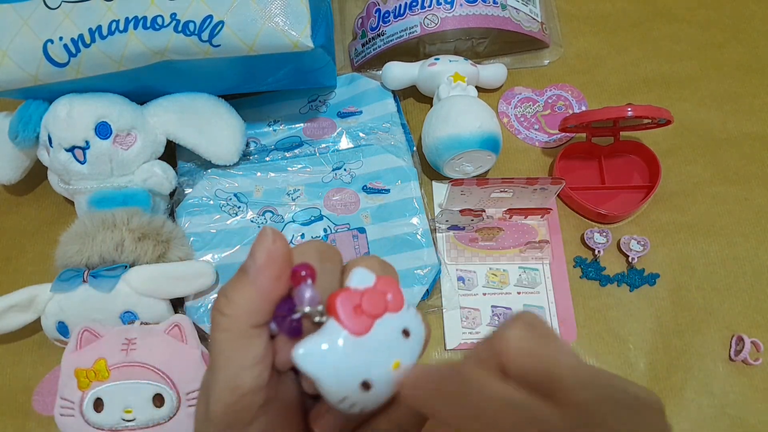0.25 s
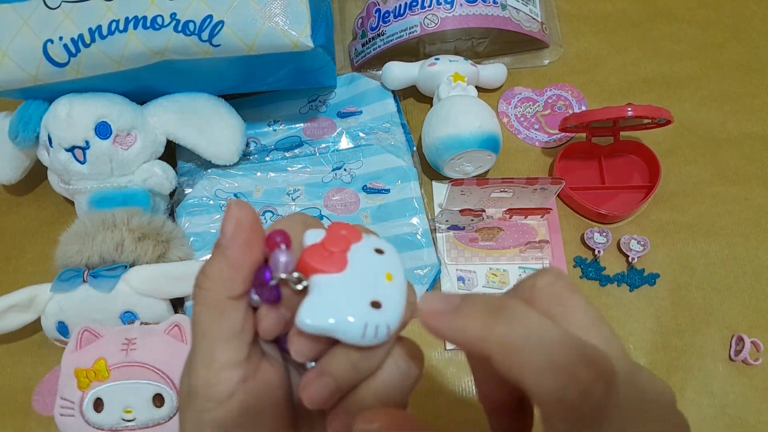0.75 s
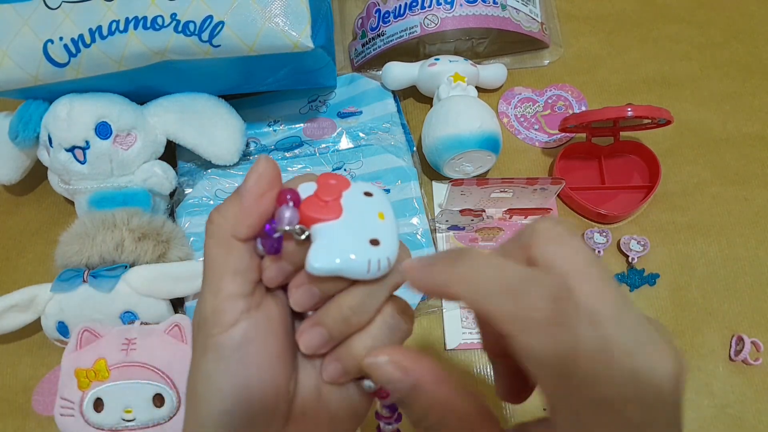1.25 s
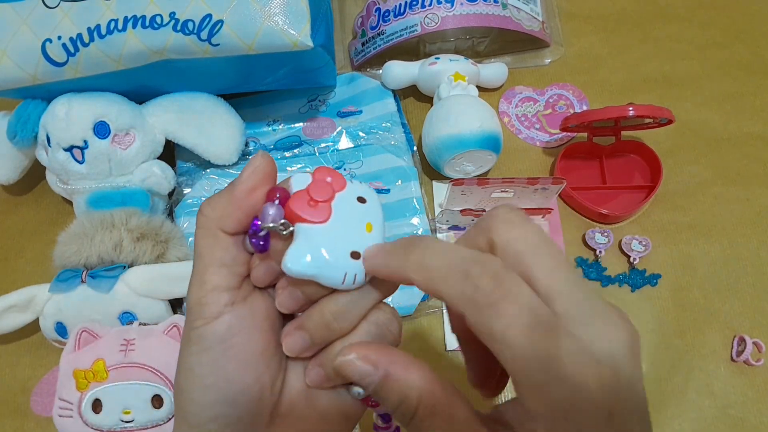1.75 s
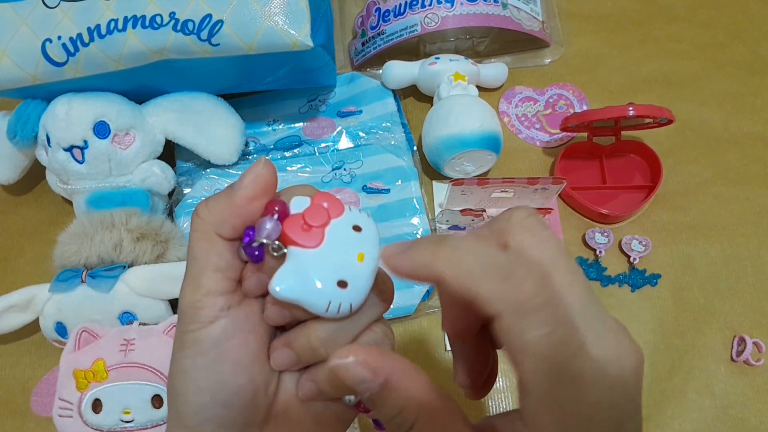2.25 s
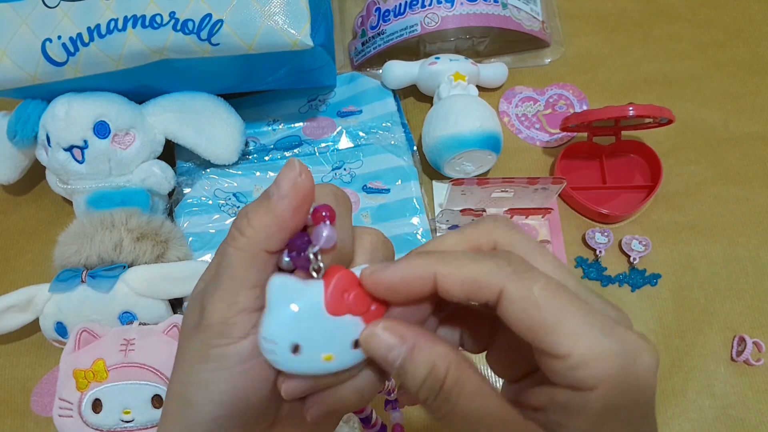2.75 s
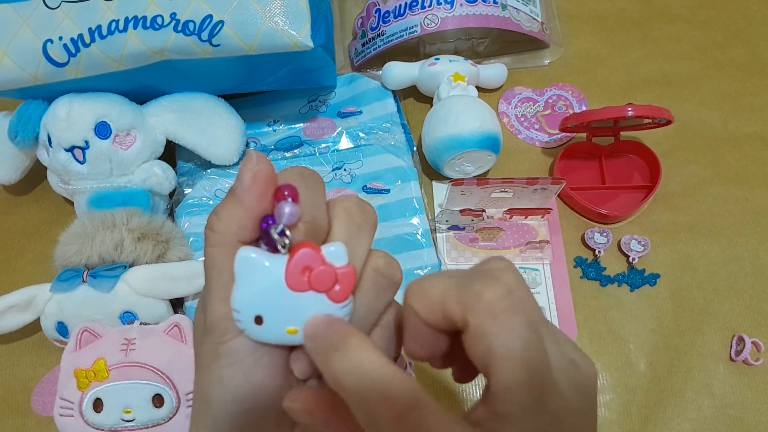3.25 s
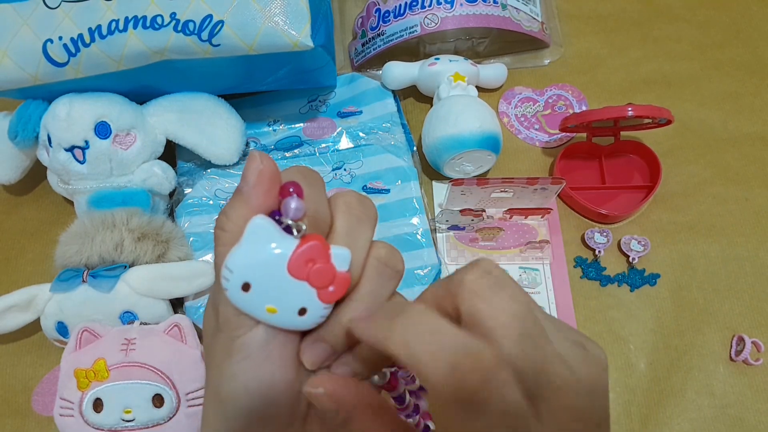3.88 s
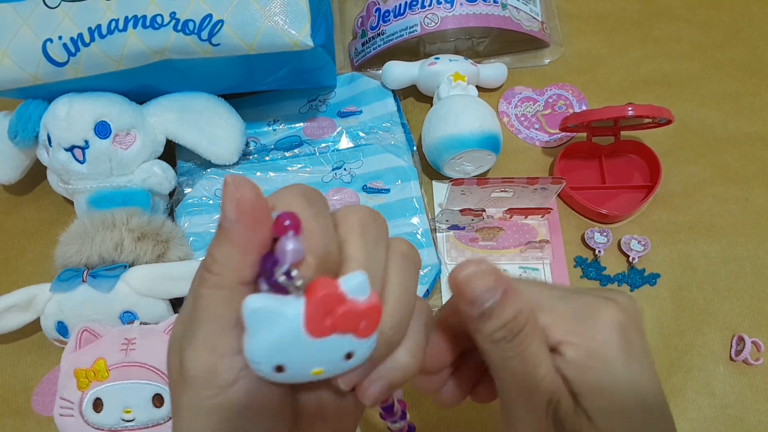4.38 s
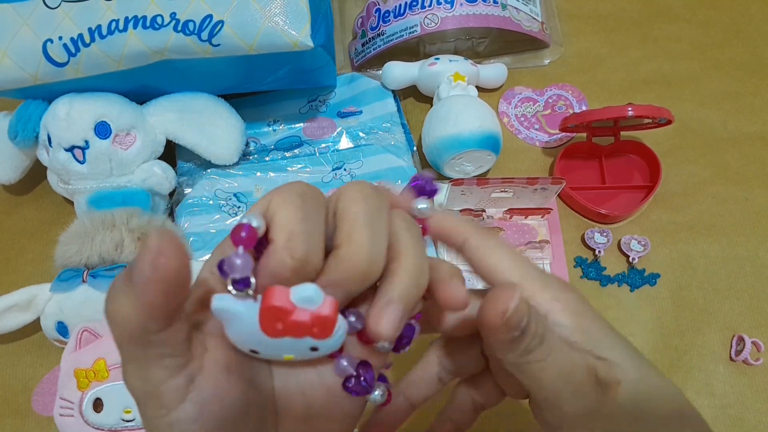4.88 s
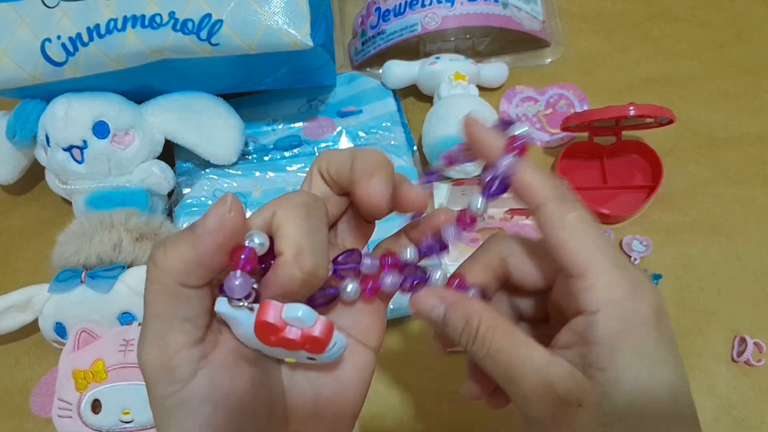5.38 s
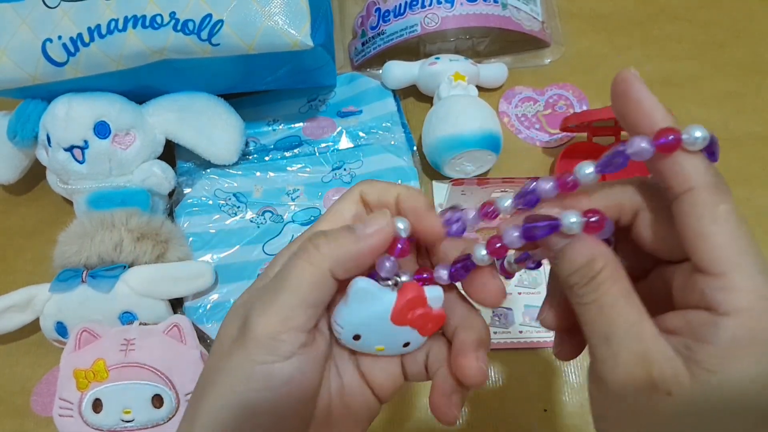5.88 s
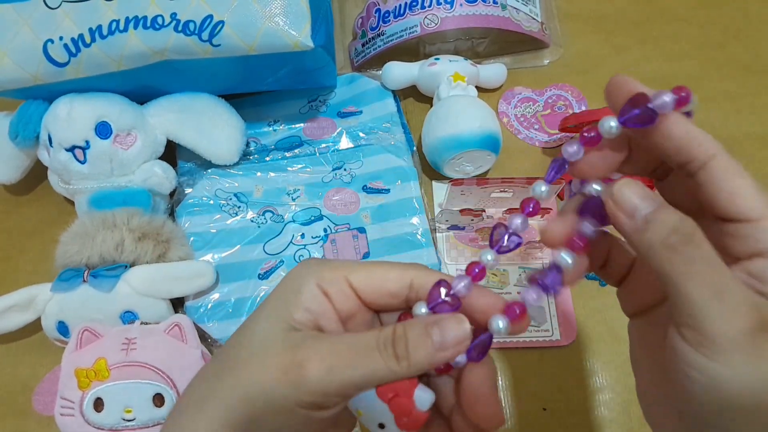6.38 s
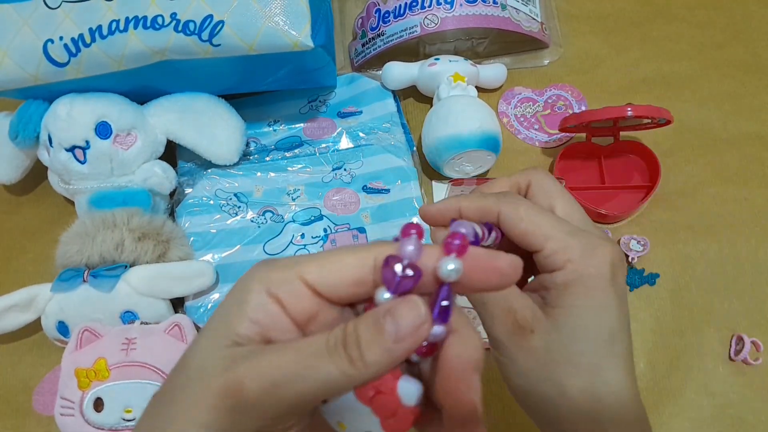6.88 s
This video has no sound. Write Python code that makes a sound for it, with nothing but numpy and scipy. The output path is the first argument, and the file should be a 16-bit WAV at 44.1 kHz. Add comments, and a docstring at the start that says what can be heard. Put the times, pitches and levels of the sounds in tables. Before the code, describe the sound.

Close, sharp plastic clacks of a flicked bracelet charm give way to lighter bead ticks, soft scrapes and low puffs of air.

```python
"""Sharp plastic clacks sound close by in a small room, then give way to lighter ticks and soft scrapes.
A finger flicks the hollow charm of a bead bracelet, so it hits the beads and swings back onto them.
Then the hands unwind the string: beads tick, slide over skin and once clash together.
The hands also jolt the table under a camera and push puffs of air at its two microphone openings,
which makes low thumps and rumbles. A soft rush of ventilation lies under it all."""
import sys
import numpy as np
from scipy import signal
from scipy.fft import rfft, irfft, next_fast_len
from scipy.io import wavfile
from scipy.ndimage import uniform_filter1d, map_coordinates

SR = 44100
rng = np.random.default_rng(int(sys.argv[2]) if len(sys.argv) > 2 else 0)


def master(y):
    """Save y as 16-bit WAV."""
    cut = np.clip(np.atleast_2d(y).T, -1, 1)
    pcm = np.round(cut * 32767)  # scale
    wavfile.write(sys.argv[1], SR, pcm.astype(np.int16))


N = 314433

# The tone colour of plastic hitting plastic. Each row: frequency in Hz, relative level in dB.
CLACK_COLOUR = [(150, -28), (600, -16), (1300, -39.5), (1950, -17), (2850, -14), (3480, -14.5),
                (4400, -9.5), (6300, -0.5), (8000, 1), (9200, -1), (11000, 1), (13500, -3.5), (15800, -4)]
# A finger flicks the charm against the beads. Each row: start in seconds, relative level in dB,
# hollow tone in dB, bright edge in dB, seconds until the charm's second edge lands (0 for one clean hit).
CHARM_FLICKS = [(0.013, -30, 4, -5.5, 0.000013), (0.1972, -23, 1.5, -2.5, 0),
                (0.3966, -38, 1.5, -2.5, 0.0063), (0.5752, -30, 4, -3, 0.0014),
                (0.8254, -26.5, 6.5, -4.5, 0.0027), (1.0743, -25.5, 6, -4, 0.0037),
                (1.297, -34.5, -3.5, -9.5, 0.0042), (1.4984, -34.5, -6, -7, 0.0042),
                (1.7164, -25, 6, -1.5, 0.0036), (1.9152, -23, -3, -3.5, 0.0032),
                (1.9219, -23.5, 4, -4.5, 0.00047), (1.9336, -26, 6, -3.5, 0.0009),
                (2.13, -27.5, 8, 2, 0.0049), (2.4745, -35.5, -3, -7.5, 0.0029),
                (2.7264, -40, 4, -1, 0.00065), (3.211, -48, 8.5, 0, 0.00035),
                (3.3871, -31, 10.5, -2, 0.0049), (3.591, -32, 10, -4, 0.0011),
                (3.6289, -30, 11, -5, 0.0033), (3.771, -25, 5.5, -6, 0.00038), (4.023, -38, 5, -7, 0.002)]
# The charm swings back onto the beads.
# Each row: start in seconds, relative level in dB, seconds until it bounces (0 for no bounce).
CHARM_SWINGS = [(0.454, -42, 0.013), (0.641, -41.5, 0.00076), (0.6877, -36.5, 0.0035),
                (0.7142, -35.5, 0.00023), (0.8744, -39, 0.0005), (0.922, -30.5, 0.00037),
                (1.152, -36.5, 0.002), (1.5524, -41.5, 0.023), (1.983, -39, 0.00073),
                (2.031, -42.5, 0.0055), (2.1739, -37, 0), (2.1991, -29, 0), (2.2355, -33.5, 0),
                (2.375, -54.5, 0.014), (2.6097, -50.5, 0.00043), (2.854, -51, 0.0082),
                (3.264, -52.5, 0.0007), (3.6055, -38, 0.00023), (3.655, -45, 0), (3.826, -31, 0.0027)]


def amp(db):
    """Turn decibels into a number to multiply a sound by."""
    return 10 ** (np.asarray(db) / 20)


def unit(x):
    """Scale a sound so that its average strength (rms) is 1."""
    return x / np.sqrt(np.mean(x ** 2) + 1e-20)


def along(points, hz):
    """Read between rows of (frequency, value), giving each octave equal room."""
    frequencies, values = np.transpose(points)
    return np.interp(np.log(hz + 1), np.log(frequencies + 1), values)


def wobble(rate):
    """A smooth curve through `rate` random values a second."""
    return map_coordinates(rng.standard_normal(int(N * rate / SR) + 4), [np.arange(N) * rate / SR])


def filtered(x, response):
    """Turn each frequency of x up or down by the gain response(hz)."""
    size = next_fast_len(N + SR // 4)
    return irfft(rfft(x, size) * response(np.fft.rfftfreq(size, 1 / SR)), size)[..., :N]


def coloured(x, spectrum):
    """Shape x by rows of (frequency in Hz, level in dB), then scale it to strength 1."""
    return unit(filtered(x, lambda hz: amp(along(spectrum, hz))))


def causal(gain):
    """A filter with these gains that never rings before the hit (minimum phase)."""
    cepstrum = irfft(np.log(np.maximum(gain, 1e-6)))
    half = len(cepstrum) // 2
    return np.exp(rfft(np.r_[cepstrum[0], 2 * cepstrum[1:half]], len(cepstrum)))


def add(out, s, x):
    """Mix x into out, starting at s seconds."""
    start = int(np.clip(round(s * SR), 0, N - 1))
    out[:, start:start + x.shape[1]] += x[:, :N - start]


def room_tone(gain_db=8, swell_db=3, rumble_hz=170):
    """Ventilation makes a soft rush whose bass swells and sinks."""
    # The colour of the rush. Each row: frequency in Hz, relative level in dB.
    air_colour = [(20, -14.5), (60, -6.5), (100, 3), (135, -10.5), (210, -17), (285, -16.5), (316, -8.5),
                  (345, -19.5), (465, -10.5), (505, -16), (645, -12), (800, -22.5), (1170, -23.5),
                  (1350, -18), (2000, -30.5), (15000, -41)]
    # Its loudness over time. Each row: time in seconds, relative level in dB.
    air_level = [(0.0, -59.5), (2.8, -60.5), (7.13, -60.5)]
    # How alike left and right are. Each row: frequency in Hz, likeness from -1 (opposite) to 1 (same).
    air_likeness = [(120, 0.69), (270, 0.83), (550, 0.62), (850, 0.023), (1450, -0.69), (2200, 0.062)]
    spread = lambda hz: np.arccos(np.clip(along(air_likeness, hz), -1, 1)) / 2
    mid = filtered(rng.standard_normal(N), lambda hz: np.cos(spread(hz)))
    side = filtered(rng.standard_normal(N), lambda hz: np.sin(spread(hz)))
    rush = coloured(np.array([mid + side, mid - side]), air_colour)
    bass = filtered(rush, lambda hz: 1 / (1 + (hz / rumble_hz) ** 4))
    waver = amp(1.5 * wobble(rate=11))
    swell = amp(swell_db * wobble(rate=19))
    level_db = np.interp(np.arange(N) / SR, *np.transpose(air_level))
    return amp(level_db + gain_db) * (bass * swell + (rush - bass) * waver)


def table_jolts(swell_cycles=0.36):
    """The bumped table sways for a few slow cycles, moving both microphones together."""
    # The hands bump the table. Each row: start in seconds, pitch in Hz, peak level in dB.
    bumps = [(0.6, 72, -28.5), (0.638, 55.3, -26), (4.087, 54.95, -30.5), (4.262, 92.3, -23.5),
             (7.005, 77, -14.5)]
    out, t = np.zeros((2, N)), np.arange(SR // 4) / SR
    for s, hz, db in bumps:
        age = t * hz / swell_cycles
        envelope = amp(db) * age ** 2 * np.exp(2 * (1 - age))
        sway = envelope * np.sin(2 * np.pi * hz * t + rng.uniform(0, 2 * np.pi))
        add(out, s, np.array([sway, sway]))
    return out


def puff_shape(peak_s, half_s, wake_db=-5.5, fall_db_per_s=113):
    """A puff swells to its peak, falls away and leaves the air stirring weakly."""
    t = np.arange(N) / SR - peak_s
    swell = np.exp(-(t / half_s) ** 2 / 2)
    wake = (t > 0) * amp(wake_db - fall_db_per_s * np.maximum(t, 0))
    return np.maximum(swell, wake)


def air_puffs(gain_db=0.5, flutter_db=-17, even_s=0.067, bump_db=2, lasting_s=0.071):
    """Swirls of passing air rumble on each microphone; a finer, bumpy flutter reaches both."""
    # A moving hand pushes air at the microphones. Each row: time of the peak in seconds,
    # half length in seconds, relative level on the left in dB, and on the right in dB.
    gusts = [(0.66, 0.031, -29.5, -31.5), (2.428, 0.016, -44, -39.5), (2.524, 0.018, -40, -42.5),
             (2.776, 0.016, -62, -24), (2.826, 0.01, -60, -33), (3.833, 0.07, -72, -41.5),
             (4.027, 0.022, -35, -48), (4.105, 0.025, -35.5, -35.5), (4.33, 0.062, -69, -29),
             (4.55, 0.082, -72, -36.5), (4.692, 0.043, -64, -32.5), (4.791, 0.041, -34.5, -27),
             (4.94, 0.082, -40.5, -41), (5.883, 0.04, -52, -26.5), (6.008, 0.036, -64, -31),
             (6.318, 0.037, -68, -26.5), (6.473, 0.051, -32.5, -34.5), (6.604, 0.025, -74, -25.5),
             (6.733, 0.026, -65, -27), (6.813, 0.011, -61, -27.5), (6.95, 0.12, -38, -33)]
    # The colour of the deep swirls. Each row: frequency in Hz, relative level in dB.
    swirl_colour = [(20, -38), (40, -7.5), (58, 2.5), (90, -0.5), (125, -7.5), (180, -18), (300, -30),
                    (700, -70)]
    # The colour of the flutter. Each row: frequency in Hz, relative level in dB.
    flutter_colour = [(70, -52), (170, -4.5), (250, 0), (400, -4.5), (700, -18.5), (6000, -42)]
    power, flow = np.zeros((2, N)), np.zeros(N)
    for s, half_s, left_db, right_db in gusts:
        gust = amp([[left_db], [right_db]]) ** 2 * puff_shape(s, half_s) ** 2
        power += gust
        flow += gust.mean(axis=0) * min(half_s / lasting_s, 1)  # a brief puff stirs little flutter
    swirls = coloured(rng.standard_normal((2, N)), swirl_colour)
    # dividing by their own smoothed power keeps the swirls fairly even within a puff
    width = int(even_s * SR)
    swirl_power = uniform_filter1d(uniform_filter1d(swirls ** 2, width), width // 2)
    rumble = np.sqrt(power / (abs(swirl_power) + 1e-3)) * swirls
    fine_swirls = coloured(rng.standard_normal((2, N)), flutter_colour)
    flutter = np.sqrt(flow) * unit(fine_swirls * amp(bump_db * wobble(rate=30)))
    return amp(gain_db) * rumble + amp(flutter_db) * flutter


def ticks(spectrum, rate, fade_s=0.0055):
    """Beads make tiny random touches of uneven size, about `rate` a second."""
    touches = (rng.random(N) < rate / SR) * rng.random(N)
    fade = amp(-60 * np.arange(SR // 20) / SR / fade_s)
    envelope = signal.fftconvolve(touches, fade)[:N]
    return coloured(envelope * rng.standard_normal((2, N)), spectrum)


def sliding(rub_db=-4, swish_hz=8400, swish_width_hz=900):
    """Beads dragged over skin make a gritty scrape with a thin, high swish on top."""
    # The colour of beads rubbing skin. Each row: frequency in Hz, relative level in dB.
    skin_colour = [(1000, -17.5), (3000, 5.5), (7500, -4), (16000, -9)]
    # Pulls of the string. Each row: middle in seconds, half length in seconds, scrape in dB, swish in dB.
    strokes = [(2.69, 0.033, -70, -66), (4.666, 0.074, -69, -69), (4.967, 0.048, -72, -63.5),
               (5.873, 0.043, -49.5, -56), (6.35, 0.034, -63.5, -81), (6.75, 0.31, -75.5, -75.5)]
    t = np.arange(N) / SR
    scrape, swish = sum(amp([[scrape_db], [swish_db]]) * np.exp(-((t - s) / half_s) ** 2 / 2)
                        for s, half_s, scrape_db, swish_db in strokes)
    grains = ticks(skin_colour, rate=300)
    rub = coloured(rng.standard_normal((2, N)), skin_colour)
    grit = unit(grains + amp(rub_db) * rub)
    hiss = unit(filtered(grit, lambda hz: np.exp(-((hz - swish_hz) / swish_width_hz) ** 2 / 2)))
    return scrape * grit + swish * hiss


def jostling(settle_db=-31, fall_db_per_s=130, skid_db=-21, skid_s=0.012):
    """Nearby beads tick as they settle after a flick, and the charm skids as it swings onto them."""
    t = np.arange(N) / SR
    settle = sum((t > s) * amp(db + settle_db - fall_db_per_s * abs(t - s)) for s, db, *_ in CHARM_FLICKS)
    skid = sum(amp(db + skid_db) * np.exp(-((t - s) / skid_s) ** 2) for s, db, _ in CHARM_SWINGS)
    return (settle + skid) * ticks(CLACK_COLOUR, rate=130)


def in_room(direct, all_round, echo_db=-3.5, early_db=-5, first_wall_s=0.0105):
    """The direct sound, plus the room's echo of the sound that leaves in all directions."""
    # The echo dies sooner in the treble. Each row: frequency in Hz, seconds to fade by 60 dB.
    echo_times = [(400, 0.91), (2500, 0.35), (7000, 0.21), (15000, 0.3)]
    hz, t, noise = signal.stft(rng.standard_normal((2, SR // 3)), SR, nperseg=256)
    tail = signal.istft(noise * amp(-60 * t / along(echo_times, hz)[:, None]), SR, nperseg=256)[1]
    # until the walls answer, there is only a weaker echo from the table
    tail *= np.where(np.arange(tail.shape[1]) / SR < first_wall_s, amp(early_db), 1)
    out = amp(echo_db) * signal.fftconvolve(all_round, tail / np.linalg.norm(tail[0]), axes=1)
    out[:, :direct.shape[1]] += direct
    return out


def ringing(tones, t, scatter):
    """One fading sine wave for each tone; the grip of the fingers shifts the pitches a little."""
    hz, db, fade_s = np.transpose(tones)[:, :, None]
    grip = 1 + scatter * rng.standard_normal(hz.shape)
    return amp(db - 60 * t / fade_s) * np.sin(2 * np.pi * hz * grip * t)


def nail_knock(db, centre_hz=750, fade_s=0.05, size=2048):
    """A fingernail makes a dull knock on the hollow charm."""
    band = signal.butter(1, [centre_hz / 2, centre_hz * 2], "band", fs=SR, output="sos")
    burst = rng.standard_normal(size) * amp(-60 * np.arange(size) / SR / fade_s)
    knock = signal.sosfilt(band, signal.sosfilt(band, burst))
    return amp(db) * np.array([knock, knock]) / knock[:SR // 200].std()  # the first 5 ms set the level


def heart_ring(db, rise_s=0.0015, size=4096):
    """A struck heart-shaped bead gives a short, clear ring, a little different at each microphone."""
    # The bead's own tones. Each row: pitch in Hz, relative level in dB, seconds to fade by 60 dB.
    heart_tones = [(3034, 5, 0.038), (4530, -7, .02), (7130, 0, .025), (8200, 3, .03), (10865, -5, .022),
                   (11620, -6, .02)]
    t = np.arange(size) / SR
    tones = ringing(heart_tones, t, scatter=0.009) * (1 - np.exp(-t / rise_s))
    return amp(db + rng.standard_normal((2, len(tones)))) @ tones


def clack(db, hollow_db, edge_db, walls_db, shell_db=-15.5, bead_db=-11, bead_count=12, size=4096):
    """Plastic hits plastic: a quick crack, with the brief ring of the beads and the charm's shell."""
    # The hollow shell's tones. Each row: pitch in Hz, relative level in dB, seconds to fade by 60 dB.
    shell_tones = [(3047, -10, 0.034), (4697, -9, 0.019), (5510, -8, 0.02263), (5980, -0.5, 0.019),
                   (6470, 4.5, 0.019), (7120, 5, 0.025), (8220, 4.5, 0.014), (9300, -4, 0.039),
                   (10260, -5, 0.027), (12570, -3.5, 0.039), (13800, -6, 0.044)]
    rise_s, contact_s, crack_fade_s, bead_fade_s = 0.00022, 0.003, 0.008, 0.017
    alike, ring_share, right_lag_s = 0.75, 0.56, 0.0001844
    t, hz = np.arange(size) / SR, np.fft.rfftfreq(size, 1 / SR)
    colour = causal(amp(along(CLACK_COLOUR, hz)))
    # the microphones share part of the sound, and each gets a part of its own
    shared, own = alike ** .5, (1 - alike) ** .5
    mics = np.array([[shared, own, 0], [shared, 0, own]])
    to_mics = lambda tones: mics @ rng.choice([-1, 1], (3, len(tones))) @ tones
    # different beads are touched each time, each with its own pitch
    bead_hz = 4200 + 10500 * (np.arange(bead_count) + rng.random(bead_count)) / bead_count
    beads = to_mics(np.sin(2 * np.pi * bead_hz[:, None] * t)) * amp(bead_db - 60 * t / bead_fade_s)
    burst = mics @ rng.standard_normal((3, size)) * amp(-60 * t / crack_fade_s)
    crack = (burst + beads) * (1 - np.exp(-t / rise_s))
    shell = to_mics(ringing(shell_tones, t, scatter=0.02))
    delay = np.exp(-2j * np.pi * hz * np.array([[0], [right_lag_s * rng.uniform(.75, 1.25)]]))
    direct = unit(irfft((rfft(crack) * colour + amp(shell_db) * rfft(shell)) * delay))
    # over all directions, the strong and weak frequencies partly even out
    all_round = ring_share ** .5 * direct + (1 - ring_share) ** .5 * unit(irfft(colour))
    # Where and how hard the parts meet sets the colour. Each row: frequency in Hz, boost in dB.
    touch = [(1400, 0), (2100, hollow_db), (3000, hollow_db), (3600, 0),
             (4400, hollow_db), (6000, 0), (8800, 0), (10500, edge_db)]
    direct, all_round = irfft(rfft([direct, all_round]) * causal(amp(along(touch, hz))))
    return amp(db) * np.sqrt(contact_s * SR / size) * in_room(direct, amp(walls_db) * all_round)


def hit_and_repeat(s, db, gap_s, again_db):
    """The start and level of a hit, and of a second hit if the gap is above 0."""
    return [(s, db), (s + gap_s, db + again_db)] if gap_s > 0 else [(s, db)]


def bracelet(clack_db=0.5, left_db=1, cupped_db=-5, shaded_db=-2):
    """Charm and beads knock together, a little to the left; the hands keep some sound from the walls."""
    # Beads click as the string unwinds.
    # Each row: start in seconds, relative level in dB, hollow tone in dB, bright edge in dB.
    bead_clicks = [(4.3424, -50, -3, -15), (4.4051, -48.5, -1, -5), (4.4544, -42.5, 12, -7),
                   (4.6, -37.5, 0.5, -7), (4.7932, -44, 1, 6), (4.935, -49, -12, -11),
                   (5.3245, -52.5, -3, 1), (5.3996, -42, -14, -3), (5.48, -51, -6, -6),
                   (5.6157, -51, -12, -2), (5.6442, -47, -13, 1), (5.8438, -37, -5, -2),
                   (5.8505, -26.5, -4, 1), (5.8545, -27.5, 5, -1), (6.309, -51.5, 5, -6),
                   (6.835, -53.5, 12, -2)]
    # Heart-shaped beads are struck. Each row: start in seconds, relative level in dB.
    heart_hits = [(0.5757, -46), (4.4543, -47), (4.6, -57), (5.8205, -48), (5.8287, -46), (5.8436, -40),
                  (5.851, -31), (5.886, -38)]
    # The fingernail meets the charm. Each row: start in seconds, relative level in dB.
    nail_hits = [(0.013, -52), (0.1971, -50.5), (1.9336, -53), (3.3877, -52.5), (3.591, -50.5),
                 (3.7711, -52)]
    out = np.zeros((2, N))
    for s, db, hollow_db, edge_db in bead_clicks:
        add(out, s, clack(db + clack_db, hollow_db, edge_db, walls_db=0))
    for start, level, hollow_db, edge_db, gap_s in CHARM_FLICKS:
        for s, db in hit_and_repeat(start, level, gap_s, again_db=3):
            add(out, s, clack(db + clack_db, hollow_db, edge_db, walls_db=0))
    # swings and hearts sound between cupped hands, so they echo less
    for start, level, bounce_s in CHARM_SWINGS:
        for s, db in hit_and_repeat(start, level, bounce_s, again_db=-1):
            add(out, s, clack(db + clack_db, hollow_db=4, edge_db=-8, walls_db=cupped_db))
    for s, db in heart_hits:
        ring = heart_ring(db)
        add(out, s, in_room(ring, amp(cupped_db) * ring))
    for s, db in nail_hits:
        knock = nail_knock(db)
        add(out, s, in_room(knock, amp(shaded_db) * knock))
    return out * amp([[left_db], [-left_db]])


def scene():
    """The bracelet, the hands and the room together."""
    return bracelet() + jostling() + sliding() + air_puffs() + table_jolts() + room_tone()


def record(dry):
    """The camera cuts off the very highest treble."""
    top_hz, slope_width_hz = 16000, 400
    return filtered(dry, lambda hz: np.clip((top_hz - hz) / slope_width_hz + .5, 0, 1))


dry = scene()
out = record(dry)
master(out)
```